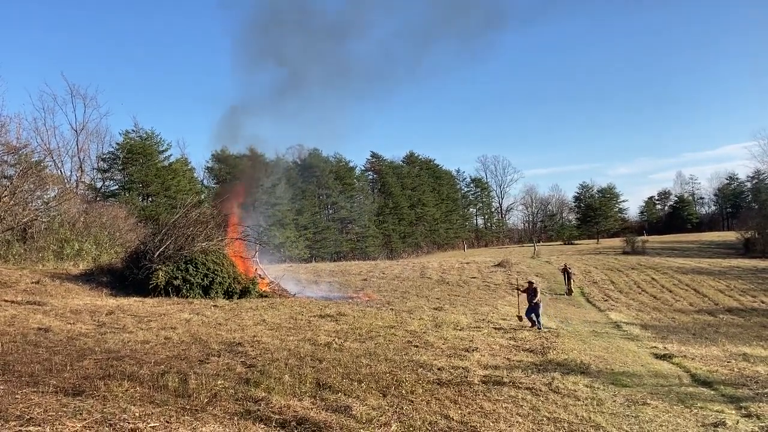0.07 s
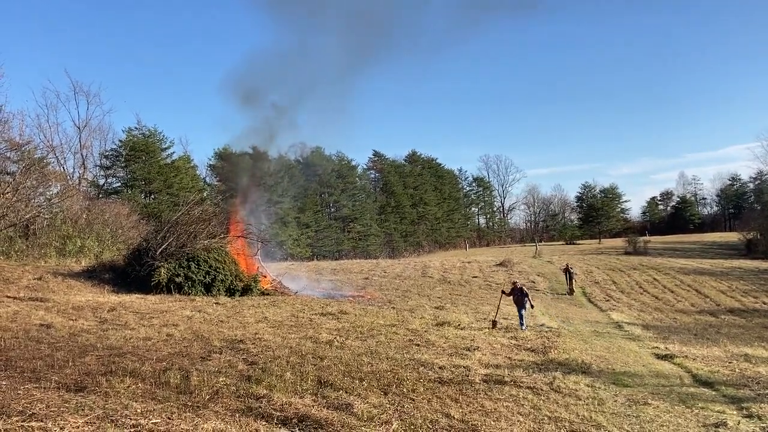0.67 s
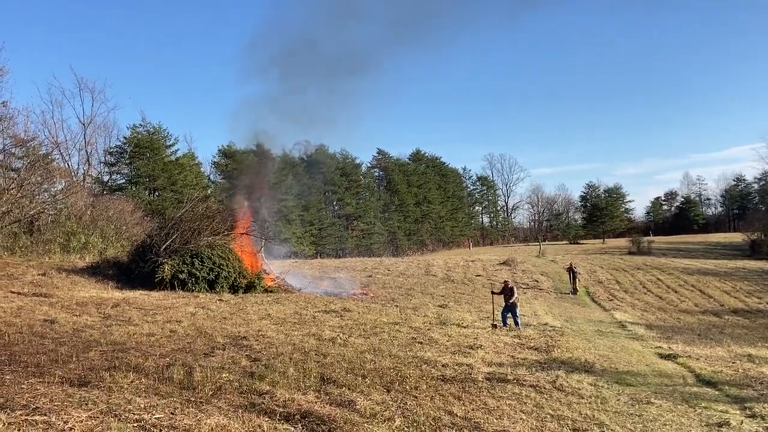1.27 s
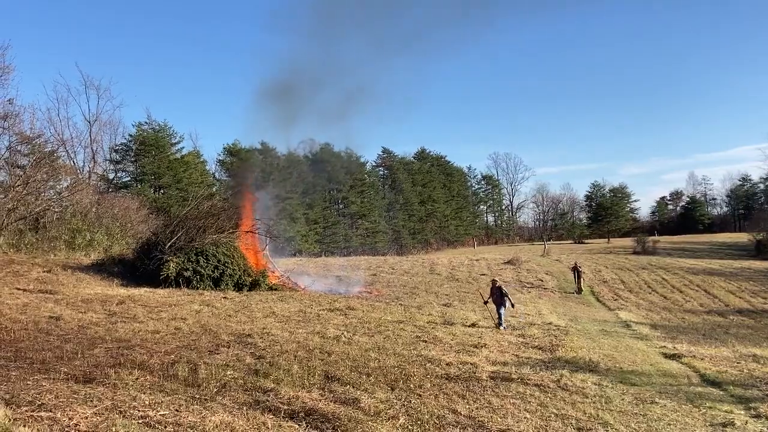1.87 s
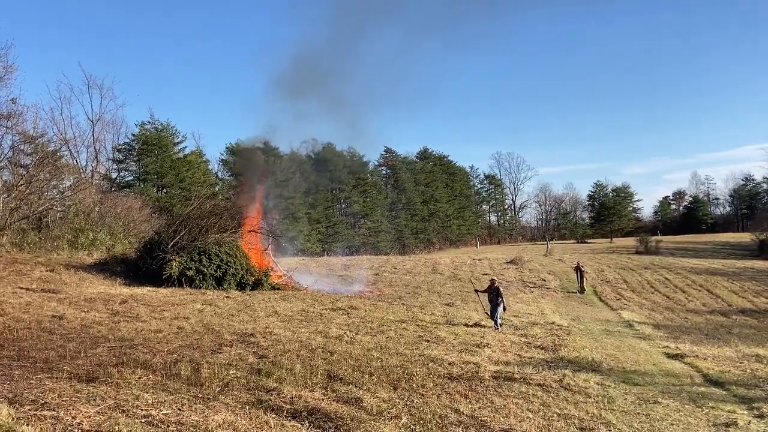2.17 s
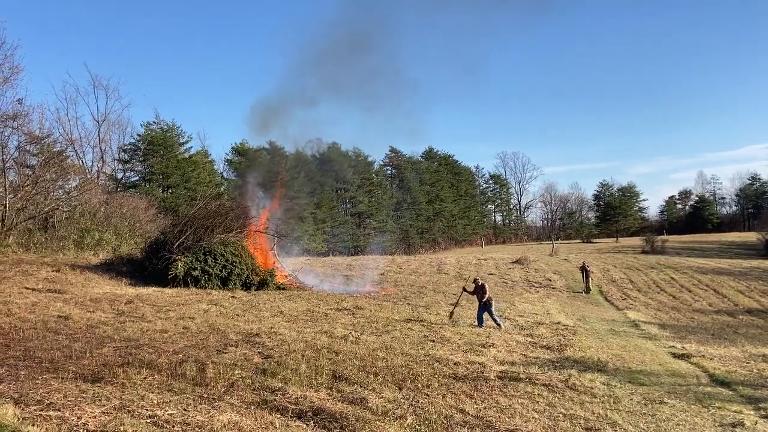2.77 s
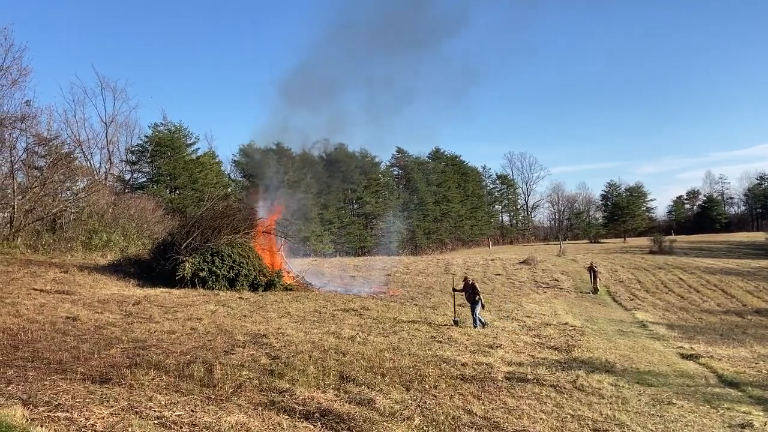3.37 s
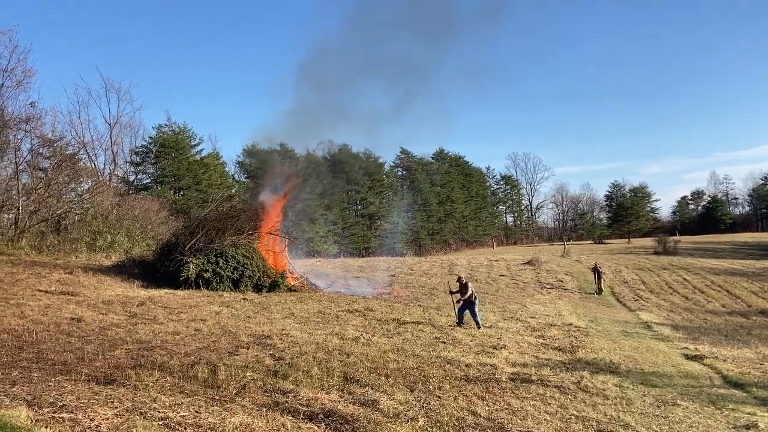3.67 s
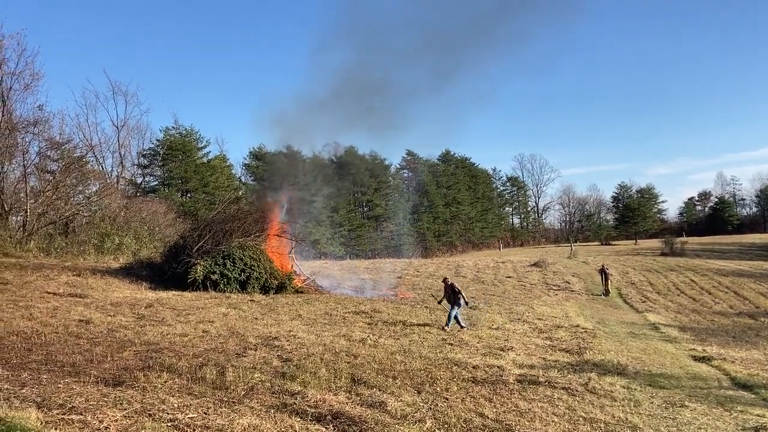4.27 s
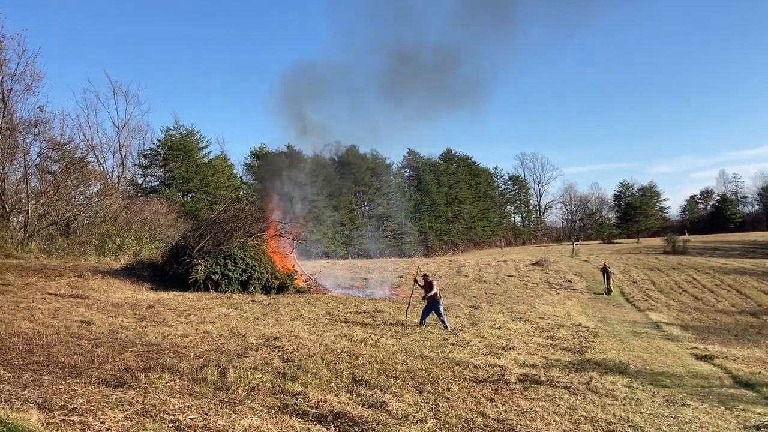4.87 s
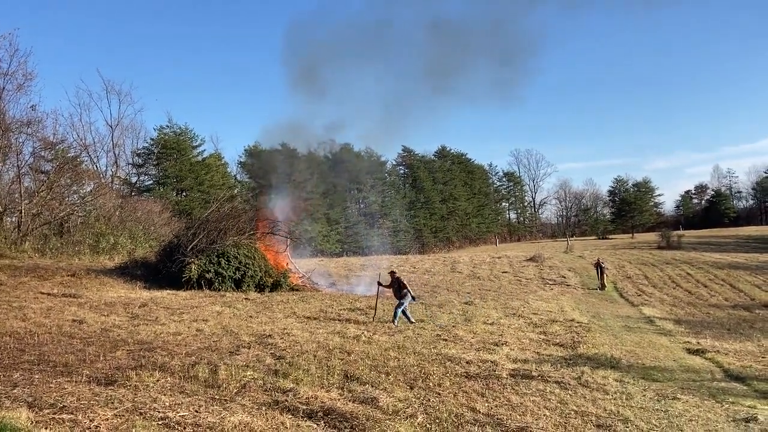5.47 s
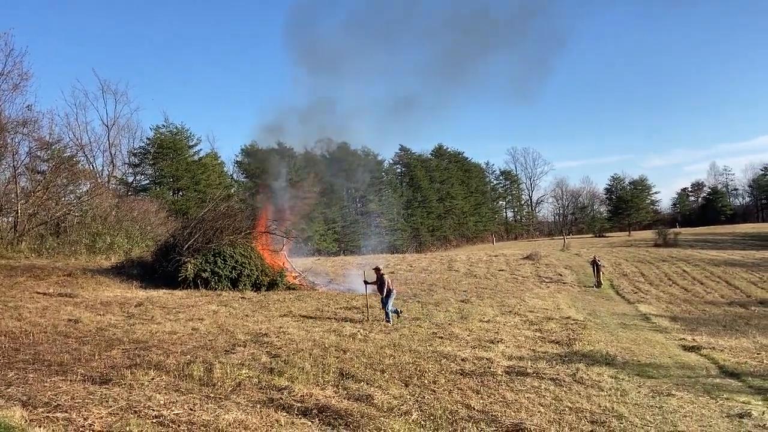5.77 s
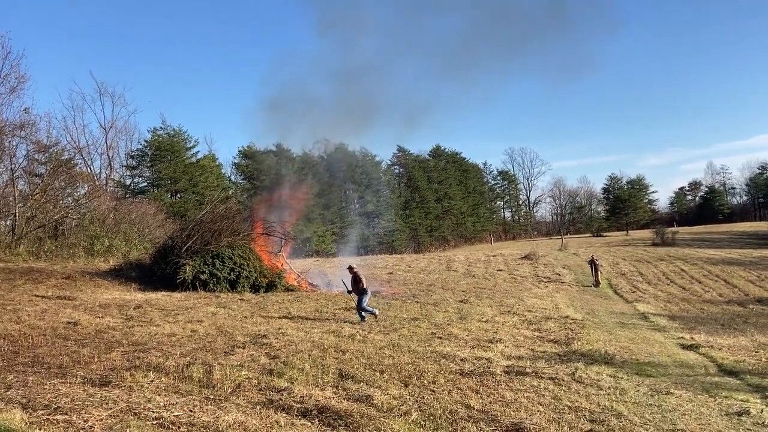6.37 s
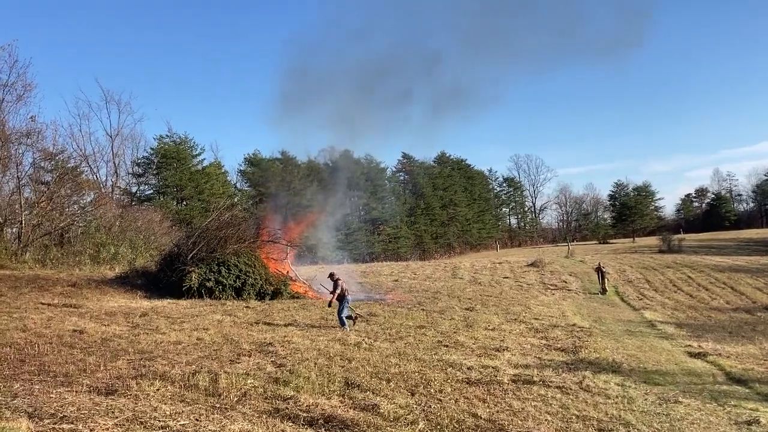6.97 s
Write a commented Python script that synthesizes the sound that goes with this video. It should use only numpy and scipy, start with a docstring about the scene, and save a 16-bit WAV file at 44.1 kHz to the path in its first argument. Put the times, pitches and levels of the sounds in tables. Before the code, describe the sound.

A brush pile burns some way off in an open field. Dense, fine twig crackling over a steady fizz runs for the whole seven seconds, with a soft, low wind rumble underneath. For the first 2.5 seconds there are only light pops and small woody ticks. At about 2.9 seconds a stick splits with a sharp, briefly ringing crack, followed by a cluster of pops around 3.4 seconds. Bright, loud pops stand out near 4.1, 4.5 and 4.6 seconds. At about 5.2 seconds a thick branch tears with the loudest snap, which echoes faintly off the tree line. Lighter pops follow, with one more sharp crack near 6.6 seconds, and the crackling carries on to the end. Faint, short, hollow huffs of flame sit within the fire's sound, around 1, 2 and 4 seconds.

```python
"""Twigs crackle densely over a fizz as a big brush pile burns some way off in an open field.
Pockets of sap burst as pressure spikes that scatter among the twigs, splitting sticks ring in
bending modes, and jets of gas flare with a hollow huff. One thick branch tears with a snap that
the tree line reflects. Wind rumbles underneath; the fire's sound arrives left and right at
slightly different times."""
import sys
import numpy as np
from scipy import signal
from scipy.fft import rfft, irfft, next_fast_len
from scipy.io import wavfile
from scipy.ndimage import uniform_filter1d, map_coordinates

SR = 44100
rng = np.random.default_rng(int(sys.argv[2]) if len(sys.argv) > 2 else 0)


def transcribe(signal):
    """Save signal, clipped to [-1, 1], as a 16-bit WAV file at the path in sys.argv[1]."""
    frames = np.atleast_2d(signal).T
    limited = np.clip(frames, -1, 1)
    pcm = np.round(limited * 32767).astype(np.int16)
    wavfile.write(sys.argv[1], SR, pcm)


N = 313551


def amp(db):
    """Amplitude ratio of a level in decibels."""
    return 10 ** (np.asarray(db) / 20)


def unit(x):
    """Normalisation to rms 1."""
    return x / np.sqrt(np.mean(x ** 2) + 1e-20)


def along(points, hz):
    """Interpolation of (f/Hz, value) points on a logarithmic frequency axis."""
    f, values = np.transpose(points)
    return np.interp(np.log(hz + 1), np.log(f + 1), values)


def curves(rows):
    """Linear interpolation of (t/s, values...) rows: one envelope per value column."""
    times, *columns = np.transpose(rows)
    return [np.interp(np.arange(N) / SR, times, column) for column in columns]


def wobble(rate):
    """Smooth random modulation: a spline through `rate` knots a second."""
    return map_coordinates(rng.standard_normal(2048), [np.arange(N) * rate / SR], mode="wrap")


def filtered(x, response):
    """Linear filtering: the spectrum of x times a complex frequency response."""
    size = next_fast_len(N + SR // 2)
    return irfft(rfft(x, size) * response(np.fft.rfftfreq(size, 1 / SR)), size)[..., :N]


def causal(gain):
    """Minimum-phase response with this gain: nothing sounds before the blow."""
    cepstrum = irfft(np.log(np.maximum(gain, 1e-6)))
    half = cepstrum.shape[-1] // 2
    return np.exp(rfft(cepstrum * np.r_[1, np.full(half - 1, 2), 1, np.zeros(half - 1)]))


def placed(start, waves):
    """Superposition of short waves, one a row, at their start times."""
    at = (np.abs(start) * SR).astype(int) + np.arange(waves.shape[1])
    return np.bincount(at.ravel(), waves.ravel(), N)[:N]


def stereo(pair, spectrum):
    """Partial coherence: two independent noises mix into a coloured, nearly alike left and right."""
    # likeness of left and right: f/Hz, coherence
    coherence = [(100, 0.99), (1200, 0.92), (3100, 1), (4000, 0.76), (5200, 0.97), (9000, 1), (15000, 1)]

    def mixing(hz):
        angle = np.arccos(np.clip(along(coherence, hz), -1, 1)) / 2
        return amp(along(spectrum, hz)) * [np.cos(angle), np.sin(angle)]

    mid, side = filtered(pair, mixing)
    return unit(np.array([mid + side, mid - side]))


def arrival(x, blend):
    """Phase difference: left and right are out of step by an amount that varies with pitch.
    A blend of 0 gives the fizz's wider spread, 1 the loud pops' slightly narrower one."""
    # phase lead of the left side: f/Hz, wider spread/rad, narrower spread/rad
    leads = [(1100, .08, .05), (2100, 1.11, .8), (3200, 2.88, 2.4), (6000, 2.85, 2.5), (6400, .8, .8),
             (6900, 0, 0), (9100, -3.14, -3.1), (11400, -6.27, -6.2), (13600, -9.4, -9.3),
             (15600, -12.55, -11.8)]
    lead_hz, wide, narrow = np.transpose(leads)
    lead = np.transpose([lead_hz, wide + blend * (narrow - wide)])
    phase = lambda hz: along(lead, hz) * np.minimum(hz / lead_hz[0], 1)  # vanishes in the bass
    return filtered(x, lambda hz: np.exp(.5j * np.outer([1, -1], phase(hz))))


def wind(gain_db=.35):
    """Wind rumbles as low-frequency noise, highly coherent between left and right."""
    # strength of the wind: t/s, relative level/dB
    strength = [(0, -46), (0.7, -48.5), (1.3, -48), (1.8, -45), (2.5, -46.5), (3.5, -46), (4.1, -47.5),
                (4.6, -46), (5.3, -46.5), (6.4, -47), (7.1, -46)]
    # spectral density of the rumble: f/Hz, relative level/dB
    spectrum = [(18, -24), (30, -28), (42, -4), (58, 0.5), (85, 0.5), (125, -4.5), (195, -10), (250, -21.5),
                (320, -28.5), (600, -49)]
    rumble_db, = curves(strength)
    return amp(rumble_db + gain_db) * stereo(rng.standard_normal((2, N)), spectrum)


def tree_line(x, rise_s=.048, trunks_per_s=360, spread_db=6):
    """Diffuse reflection: each stand of trees returns a patter of echoes, different in each ear."""
    # stands of trees: delay/s, level/dB, t60/s
    stands = [(.14, -19, 0.68), (.41, -30.5, 0.97)]
    # reflection spectrum of the trees: f/Hz, relative level/dB
    spectrum = [(300, -25), (800, -9), (1500, -2), (2300, 0), (4300, -1), (6500, -7), (14000, -35)]
    t = np.arange(int(1.5 * SR)) / SR
    fade = sum(amp(db - 60 * np.maximum(t - delay, 0) / t60) / (1 + np.exp((delay - t) / rise_s))
               for delay, db, t60 in stands)
    trunks = rng.standard_normal((2, N))
    trunks *= amp(spread_db * (wobble(trunks_per_s) + rng.standard_normal((2, N))))
    patter = filtered(trunks, lambda hz: amp(along(spectrum, hz)))[:, :len(t)]
    impulse_response = unit(patter) * fade / np.sqrt(.05 * SR)
    return signal.fftconvolve(x[:1], impulse_response, axes=1)[:, :N]


def fizz(wood_db, twig_db, crossover_hz=3600, gain_db=3):
    """Countless crackles sum incoherently to noise: thick wood gives the lows, thin twigs the highs."""
    # spectral density of the tiny crackles: f/Hz, relative level/dB
    spectrum = [(150, -29), (380, -9), (560, -1), (720, -1), (950, -5), (1180, 1.5), (1480, -2.2),
                (2200, 0), (3000, -2), (3900, .3), (5200, -3.5), (6600, -3), (8500, .2), (11500, -3.8),
                (15300, -16), (16200, -40)]

    def sparks(flicker_db):
        noise = rng.standard_normal((2, N))
        spiky_db = flicker_db * wobble(260) + 3.2 * rng.standard_normal(N)
        return stereo(noise * amp(spiky_db), spectrum)

    low_share = lambda hz: 1 / (1 + (hz / crossover_hz) ** 4)
    wood = filtered(sparks(flicker_db=2.0), lambda hz: np.sqrt(low_share(hz)))
    twigs = filtered(sparks(flicker_db=2.5), lambda hz: np.sqrt(1 - low_share(hz)))
    return amp(wood_db + gain_db) * unit(wood) + amp(twig_db + gain_db) * unit(twigs)


def flares(note_share=.33, sag=.156, waver_rad=.99):
    """Combustion noise: gas jets ignite with a huff and a hollow note that sags as pressure drops."""
    # flames flaring up: t/s, duration/s, level/dB, starting f/Hz
    jets = [(1.004, .05, -53, 770), (1.875, .03, -50, 580), (1.93, .12, -51.5, 620), (3.44, .035, -53, 720),
            (3.958, .022, -46.5, 650), (4.012, .072, -49, 740), (5.922, .02, -51, 620)]
    # spectral density of a flame: f/Hz, relative level/dB
    spectrum = [(130, -32), (230, 2), (370, -12), (550, -2), (720, 0), (950, -12), (2000, -52), (5000, -60)]
    t = np.arange(N) / SR
    huff = stereo(rng.standard_normal((2, N)) * amp(1.4 * wobble(90)), spectrum)
    waver = waver_rad * wobble(90)
    out = np.zeros((2, N))
    for start, duration, db, hz in jets:
        on = (t >= start) & (t < start + duration)
        spent = (t[on] - start) / duration
        note = np.sin(2 * np.pi * np.cumsum(hz * (1 - sag * spent)) / SR + waver[on])
        flame = np.sqrt(1 - note_share) * huff[:, on] + np.sqrt(2 * note_share) * note
        out[:, on] += amp(db) * np.sqrt(np.sin(np.pi * spent)) * flame
    return out


def bursts(rows, direct, width, pile_db, pile_t60, q, size=2400):
    """Scattering: each pressure spike is followed by a fast decay in the twigs and the pile's tail."""
    # transmission over grass and through air: f/Hz, relative level/dB
    path = [(100, -26), (330, -7), (620, 2), (950, -3), (1180, 1), (1480, -2), (2100, .5), (2700, -.5),
            (3900, 1.5), (5600, -1.5), (9500, 1), (14000, -4), (16500, -13)]
    start, db, centre, t60 = np.transpose(rows)[:, :, None]
    t, hz = np.arange(size) / SR, np.fft.rfftfreq(size, 1 / SR) + 1
    # faint bursts lie deep in the pile, so more of their sound is tail
    tail_db = pile_db - .6 * np.clip(db + 40, 0, 15)
    fade = amp(-60 * t / t60) + amp(tail_db - 60 * t / pile_t60)
    noise = rng.standard_normal((len(start), 2, size)).transpose(1, 0, 2)
    mid, side = noise * fade / np.linalg.norm(fade, axis=1, keepdims=True)
    # the longer the scatter, the less of the spike gets out
    mid[:, :1] += direct * (.01 / t60) ** .7
    pair = np.array([mid + width * side, mid - width * side])
    # the size of the bursting pocket sets a broad resonance and limits the treble
    pocket = 1 / (1 + 1j * q * (hz / centre - centre / hz)) / (1 + 1j * hz / (5 * centre))
    waves = irfft(rfft(pair) * pocket * causal(amp(along(path, hz))))
    energy = np.mean(np.sum(waves ** 2, axis=2, keepdims=True), axis=0)
    waves *= amp(db) / np.sqrt(energy / (.005 * SR))  # level of the energy spread over 5 ms
    return np.array([placed(start, channel) for channel in waves])


def bunches(rate_hz=30, span_s=.2):
    """Clustering: one twig sets off its neighbours, in flurries and lulls that even out over span_s."""
    flurry = wobble(rate_hz)
    return unit(np.tanh(flurry - uniform_filter1d(flurry, int(span_s * SR))))


def crackle(twig_db, bunching, count=850, bunch_depth=.55):
    """Twigs split as a random point process, denser as the fire grows; most are faint, a few loud."""
    thick_hz, thin_hz, thin_bias = 1200, 11900, 1.82
    faintest_db, spread_db, range_db = 1, 3.5, 9
    when, strength, pitch, decay = rng.random((count, 4)).T
    cumulative_rate = np.cumsum(amp(twig_db) * np.exp(bunch_depth * bunching))
    at = np.searchsorted(cumulative_rate, when * cumulative_rate[-1])
    db = twig_db[at] + faintest_db + np.minimum(-spread_db * np.log(strength), range_db)
    centre_hz = thick_hz * (thin_hz / thick_hz) ** (pitch ** (1 / thin_bias))
    scatter_t60 = .003 + .009 * decay
    rows = np.transpose([at / SR, db, centre_hz, scatter_t60])
    return bursts(rows, direct=.8, width=.22, pile_db=-10, pile_t60=.06, q=1.1)


def rings(modes, size=3000, rise_s=.0002):
    """Free vibration: each bending mode of a stick is an exponentially damped sinusoid."""
    start, db, hz, cycles = np.transpose(modes)[:, :, None]
    t, t60 = np.arange(size) / SR, cycles / hz
    envelope = amp(db - 60 * t / t60) * (1 - np.exp(-t / rise_s))
    return placed(start, envelope * np.sin(2 * np.pi * hz * t))


def knocks(thud_db=-12.5, thud_t60=.01, cutoff_hz=454):
    """Impulsive excitation: a splitting stick rings, with a rough thud around the same pitch."""
    # bending modes of the thicker sticks: t/s, level/dB, f/Hz, cycles to decay by 60 dB
    modes = [(.221, -39, 1180, 13), (0.2737, -36, 570, 7), (.4445, -34, 1210, 14), (.505, -33.5, 1190, 25),
             (.545, -34.5, 1160, 12), (1.0055, -33.5, 1100, 13), (1.283, -37.5, 1310, 8),
             (1.527, -33, 1650, 14), (2.8596, -17.5, 1770, 20), (2.86, -26, 780, 10.5),
             (2.9126, -29, 1250, 5), (3.293, -33.5, 1300, 66), (3.4334, -26, 795, 10),
             (3.4332, -30, 1150, 17), (4.1266, -23, 1860, 12), (4.1268, -35, 680, 3),
             (4.6122, -33, 2350, 10), (5.2345, -17.5, 670, 2), (5.2343, -17.5, 1110, 17),
             (5.2398, -16.5, 2170, 47), (5.2358, -22, 1480, 34), (5.611, -39, 480, 3),
             (5.9245, -36, 1100, 8), (6.6147, -27.5, 2040, 27), (6.6155, -35, 740, 10),
             (6.969, -41, 1160, 14)]
    start, db, hz, _ = np.transpose(modes)
    thuds = np.transpose([start, db + thud_db, hz, np.full(len(start), thud_t60)])
    # the rings carry little sound below the cutoff
    radiation = signal.butter(2, cutoff_hz, "highpass", fs=SR, output="sos")
    ring = signal.sosfilt(radiation, rings(modes))
    return ring + bursts(thuds, direct=.19, width=.076, pile_db=-19, pile_t60=.038, q=.76)


def pops():
    """Sudden release of pressure or stress: pockets of sap and steam burst, and a branch tears apart."""
    # bursting sap pockets: t/s, level/dB over 5 ms, centre f/Hz, scatter t60/s
    pockets = [(.1386, -46, 5640, 0.0061), (.175, -46, 5600, .012), (.186, -44, 3600, .008),
               (.2729, -36, 4000, 0.028), (.3145, -45, 12500, .006), (.426, -48, 3900, .01),
               (.4445, -47, 3000, 0.012), (.4584, -43, 4220, 0.01), (.505, -47, 1990, 0.016),
               (.691, -48.5, 4800, 0.0064), (.907, -40, 5770, .012), (1.0036, -39, 4020, 0.043),
               (1.2725, -52, 3500, 0.0064), (1.2833, -49, 3900, 0.0046), (1.4595, -41, 7050, 0.023),
               (1.527, -47, 2470, 0.01), (1.9575, -40, 7500, 0.0089), (1.9845, -43.5, 4000, 0.0087),
               (2.1725, -42.5, 4200, 0.0055), (2.1795, -42, 4800, 0.0063), (2.2836, -42.5, 5000, 0.011),
               (2.5035, -41.5, 4400, 0.0094), (2.7975, -41.5, 4600, 0.0068), (2.8596, -32.5, 3000, 0.016),
               (2.9515, -37.5, 3330, 0.0086), (3.1732, -39.5, 7840, 0.0093), (3.2165, -40, 5000, 0.0065),
               (3.2345, -40, 6200, 0.014), (3.293, -34, 4000, 0.059), (3.4013, -39, 4200, 0.0046),
               (3.4334, -32, 3820, .011), (3.4435, -33.5, 2400, 0.09), (3.4569, -35, 4400, .018),
               (3.5915, -40.5, 4600, 0.0068), (3.6235, -40.5, 2840, 0.0099), (3.6771, -38, 5430, 0.017),
               (3.789, -38.5, 8600, 0.0051), (4.0232, -36, 2400, 0.009), (4.0563, -25, 5600, 0.0076),
               (4.1266, -31.5, 7460, .0036), (4.2114, -33.5, 11500, 0.0024), (4.2919, -38, 5600, .0086),
               (4.3375, -40, 3120, .008), (4.3998, -36.5, 5600, 0.0083), (4.4136, -35.5, 3560, 0.028),
               (4.4248, -35.5, 7200, 0.0089), (4.4779, -22, 8400, .0052), (4.5464, -37.5, 5000, .007),
               (4.6127, -21, 4870, 0.01), (4.6429, -35, 5000, .016), (4.684, -37, 7450, .004),
               (4.6884, -36, 7000, 0.0076), (4.8074, -35.5, 4050, 0.0068), (4.83, -31.5, 6100, 0.055),
               (5.122, -44, 5500, 0.0061), (5.1397, -34, 5000, 0.12), (5.3976, -35.5, 6200, 0.03),
               (5.9245, -43, 2200, 0.0085), (6.1965, -40, 7500, .02), (6.4095, -39.5, 7000, 0.014),
               (6.615, -30, 9300, 0.0072), (6.7219, -39, 6800, .006), (6.8685, -36, 5600, 0.0054),
               (6.9125, -41, 3400, .012), (6.9702, -39, 3580, 0.027), (7.039, -35, 6840, 0.021)]
    # a thick branch tearing, bark first, then core: t/s, level/dB over 5 ms, centre f/Hz, scatter t60/s
    tear = [(5.2329, -23.5, 3500, 0.026), (5.2346, -22, 2780, .012), (5.2363, -25.5, 2000, .0087),
            (5.2397, -24.5, 1810, 0.06), (5.2485, -27, 4500, 0.034), (5.2522, -23.5, 1660, 0.079)]
    return bursts(pockets + tear, direct=.62, width=.22, pile_db=-17, pile_t60=.08, q=.75)


def scene():
    """Superposition of the fire's direct sound, the echo of its loud events and the wind."""
    # how hard the pile burns: t/s, thick wood level/dB, thin twig level/dB
    burn = [(0.0, -59.5, -51.5), (0.44, -56, -52), (0.71, -55.5, -54.5), (1.03, -55, -52),
            (1.5, -57.5, -52.5), (1.7, -56, -54.5), (2.04, -54, -53), (2.5, -56, -53), (2.93, -54, -53),
            (3.5, -54, -52.5), (3.88, -54, -54.5), (4.1, -54, -52.5), (4.75, -56, -51), (4.97, -55, -53),
            (5.15, -56, -52), (5.33, -54.5, -52), (6.06, -55, -53.5), (6.4, -56.5, -53.3), (6.79, -56, -52),
            (7.11, -54.5, -54)]
    swell_db, balance_db = 1.48, .2  # the wood's fizz swells with each bunch; the left is a little louder
    wood_db, twig_db = curves(burn)
    bunching = bunches()
    loud = pops() + knocks()
    bed = fizz(wood_db + swell_db * bunching, twig_db) + flares()
    twigs = crackle(twig_db, bunching)
    fire = arrival(bed, blend=0) + arrival(twigs, blend=.34) + arrival(loud, blend=1)
    return fire * amp([[balance_db], [-balance_db]]) + tree_line(loud) + wind()


def record(dry, cutoff_hz=15850):
    """Band limiting: a steep low-pass removes the highest treble."""
    return filtered(dry, lambda hz: 1 / np.sqrt(1 + (hz / cutoff_hz) ** 160))


dry = scene()
out = record(dry)
transcribe(out)
```